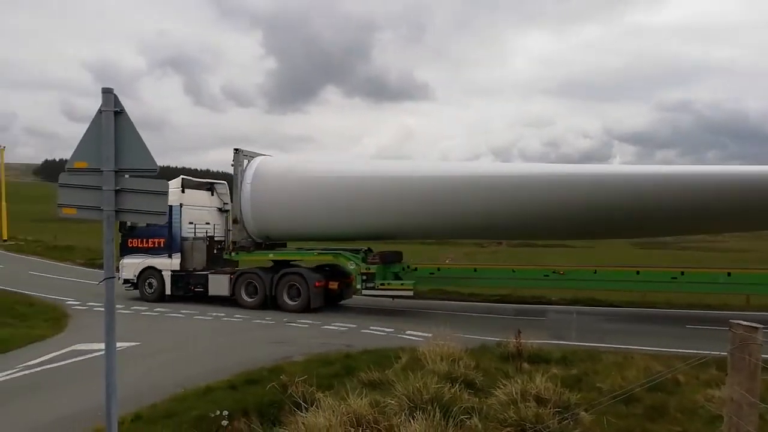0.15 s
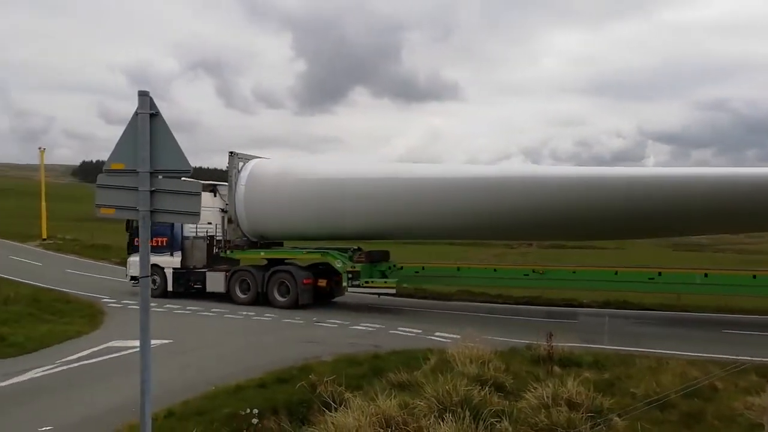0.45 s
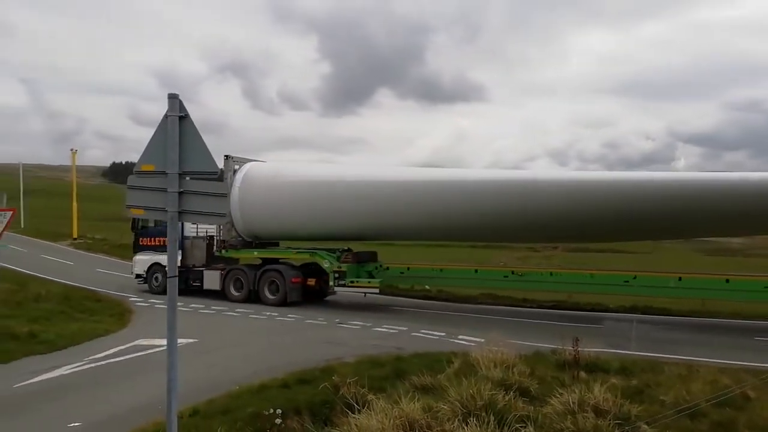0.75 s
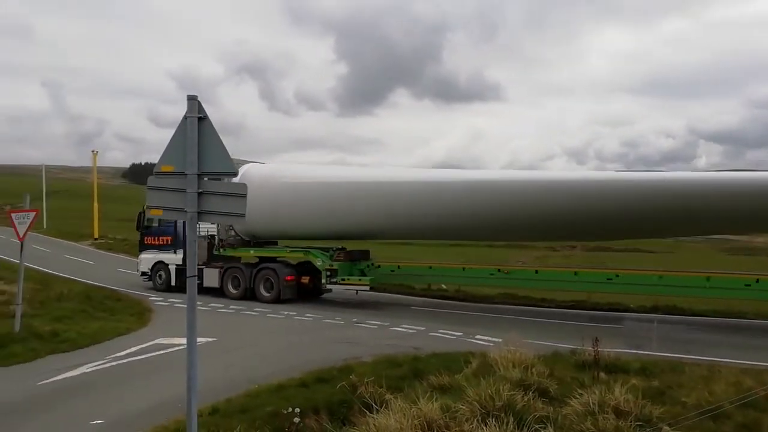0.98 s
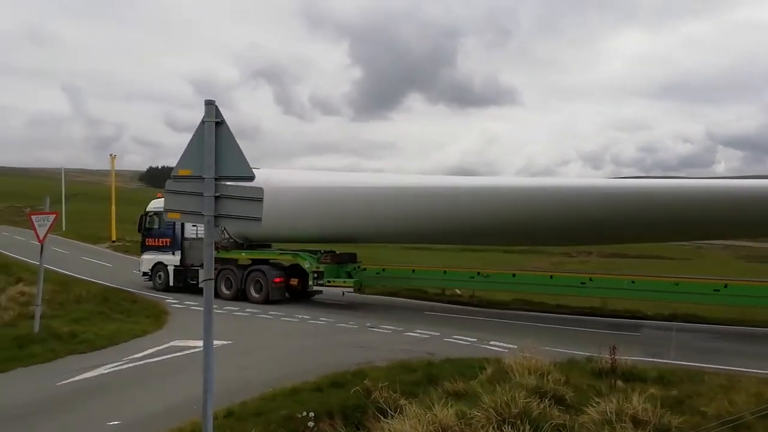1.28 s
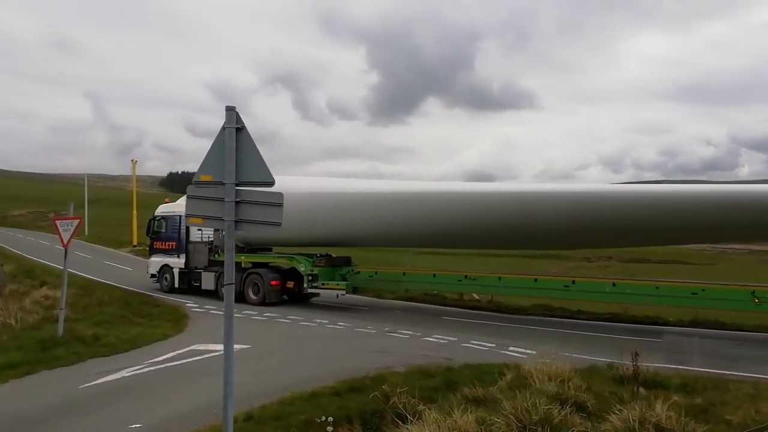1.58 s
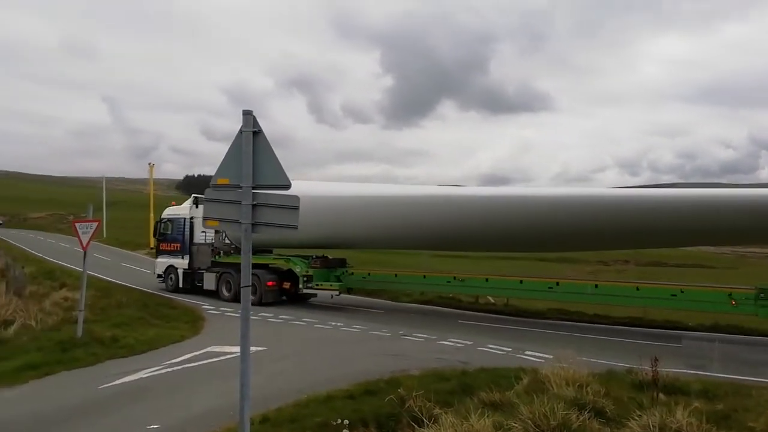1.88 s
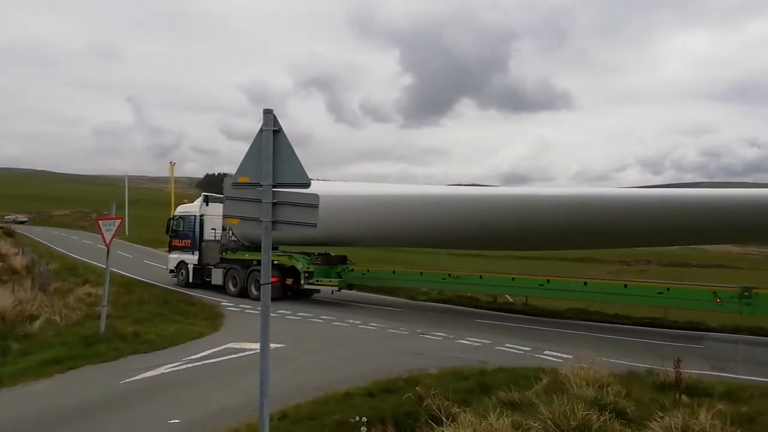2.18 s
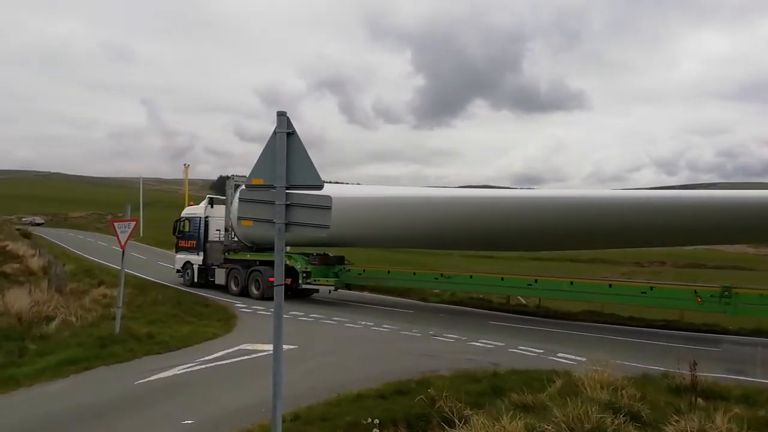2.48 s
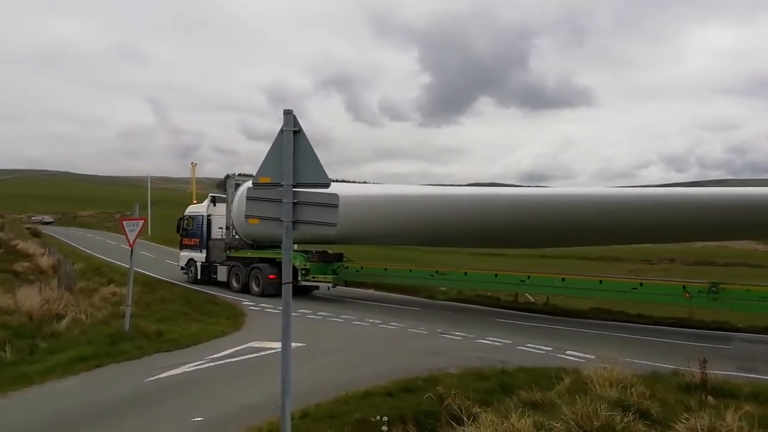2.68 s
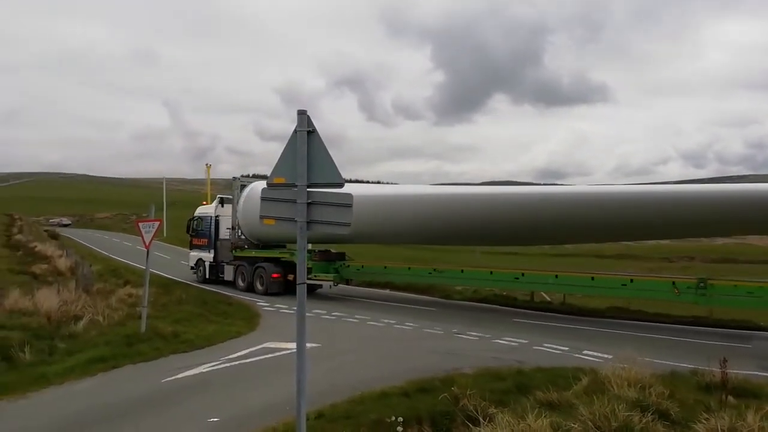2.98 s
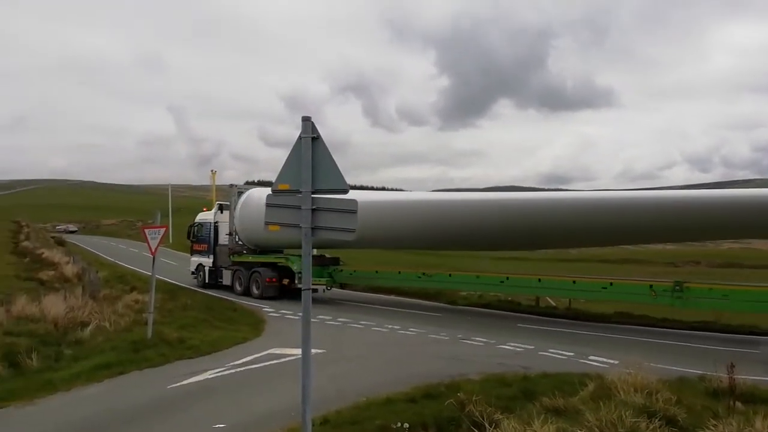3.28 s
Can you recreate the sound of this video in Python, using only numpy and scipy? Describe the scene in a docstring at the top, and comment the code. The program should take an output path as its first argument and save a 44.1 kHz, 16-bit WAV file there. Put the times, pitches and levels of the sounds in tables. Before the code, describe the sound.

A heavy truck draws away on an open moor road: low engine drone, tyre roar and airy hiss fade, with thin high brake squeals, brief squeaks near one second and a final air puff. Spaced stereo microphones outdoors.

```python
"""A heavy diesel truck with a long trailer crawls past and away on an open moor road.
Its exhaust is two trembling sines; tyres, engine block, rumble and leaking air are shaped noise.
Brakes squeal as notes in narrow-band noise; dry joints squeak, tyres scuff and a valve puffs air.
A second engine idles nearby: low sines and a tick of noise per cycle.
A pair of spaced microphone ports hears it from the left."""
import sys
import numpy as np
from scipy import signal
from scipy.fft import rfft, irfft, next_fast_len
from scipy.io import wavfile
from scipy.ndimage import uniform_filter1d, map_coordinates

SR = 44100
rng = np.random.default_rng(int(sys.argv[2]) if len(sys.argv) > 2 else 0)


def pcm_store(signal):
    """Save signal as 16-bit PCM."""
    levels = np.round(np.clip(np.atleast_2d(signal), -1, 1) * 32767)
    wavfile.write(sys.argv[1], SR, levels.astype(np.int16).T)


def convert_level_to_amplitude(level_db):
    """Map a level in decibels to its linear amplitude factor."""
    exponent = np.asarray(level_db, float) / 20
    return 10 ** exponent


N = 152145  # samples

# Exhaust firing note. Each row: time in seconds, pitch in Hz, level in dB.
FIRING_NOTE = [(0, 60, -53), (.1, 63.34, -56), (.3, 62.6, -34.5), (.4, 62.7, -38.5), (.48, 62.7, -37.5),
               (.68, 62.77, -43.5), (.8, 62.4, -32.5), (.88, 60.74, -38.5), (1.1, 59.46, -39),
               (1.21, 59.4, -41), (1.33, 59.3, -39.5), (1.7, 58.5, -72), (3.45, 58.2, -58.5)]
# Harmonics of the firing note. Each row: multiple of the pitch, level relative to the note in dB.
FIRING_HARMONICS = [(1, 0), (2, -22)]

# Idling engine orders. Each row: multiple of IDLE_HZ, level relative to IDLE_DB in dB.
IDLE_HARMONICS = [(1, -6.5), (2, 1.5), (3, -13)]
# Steady low tones by the idling engine. Each row: frequency in Hz, level in dB.
HUM_TONES = [(120, -56.5), (130, -59.5)]
# Colour of the idle ticks. Each row: frequency in Hz, relative density in dB per Hz.
CLATTER_SPECTRUM = [(3800, -21), (4800, 2), (6000, 8), (6900, -24.5)]
IDLE_HZ, IDLE_DB = 28.24, -44
CLATTER_DB, TICK_DECAY_S = -60, 0.02

# Passing truck. Each row: time in seconds, tyre roar in dB, air hiss in dB, both before a fixed lift.
PASS_LEVELS = [(.05, -42, -44.5), (.7, -42, -44), (1.13, -43.5, -46.5), (1.19, -43, -42), (1.25, -43, -46),
               (1.35, -45, -42.5), (1.46, -46, -48), (1.8, -47.5, -52), (2.2, -49.5, -51.5),
               (2.27, -49, -46.5), (2.34, -49.5, -53), (2.75, -50.5, -47), (2.9, -54, -46.5),
               (3.03, -52, -51.5), (3.45, -49, -50.5)]
# Noise colours of the truck. Each row: frequency in Hz, relative density in dB per Hz.
TYRE_SPECTRUM = [(700, -33), (1100, -6.5), (1600, 2), (1820, -3), (2100, 1), (2400, -11.5), (4000, -13),
                 (7000, -28)]
BLOCK_SPECTRUM = [(250, -25), (450, -12.5), (700, -0.5), (1000, 0), (1400, -7.5), (2000, -42.5)]
AIR_SPECTRUM = [(1500, -2.5), (2400, 4), (3900, -4), (5000, -1.5), (6400, -7), (7400, -3), (8700, 4),
                (9400, -3.5), (9800, -6.5), (11500, -11.5), (13000, -28), (16000, -45)]
RUMBLE_SPECTRUM = [(15, -40), (45, -6), (65, -4.5), (95, -8.5), (170, -16.5), (300, -18), (420, -26),
                   (700, -52)]
BLOCK_DB, BLOCK_SWING_SHARE = -49.5, 1.3  # share of the tyre roar's swing in dB
RUMBLE_DB, RUMBLE_SWING_SHARE = -46, 0.49

# Likeness of noise at the two ports. Each row: frequency in Hz, likeness from 0 to 1.
PORT_LIKENESS = [(60, 0.95), (250, 1), (700, 1), (1500, 0.74), (3000, 0.23), (6000, 0.08), (12000, 0.49)]
# Phase between the ports. Each row: frequency in Hz, lead of the left port in radians.
PORT_LEAD = [(0, -0.29), (520, 1.25), (1550, 1.2), (2840, 3.5), (4050, 7.5), (8870, 24.5), (16000, 43)]
# Level between the ports. Each row: frequency in Hz, left over right in dB.
PORT_TILT = [(380, 0), (700, 5), (1290, -6), (2380, 5.5), (4400, -1.5), (8120, 4.5)]

# Brake squeals, a table each. Each row: time in seconds, pitch in Hz, level in dB before a fixed lift.
BRAKE_SQUEALS = [
    [(.53, 10200, -47), (.6, 10360, -36), (.65, 10530, -35.5), (.78, 10520, -33.5), (.91, 10400, -43),
     (1.0, 10280, -42.5), (1.12, 10300, -34.5), (1.155, 10500, -42), (1.23, 10350, -50), (1.3, 10280, -48),
     (1.38, 10300, -62)],
    [(1.42, 10170, -45), (1.56, 10460, -39), (1.64, 10500, -44), (1.7, 10600, -64), (1.74, 10270, -43.5),
     (1.8, 10750, -66), (1.845, 10200, -46), (1.89, 10600, -58)],
    [(2.13, 10000, -76), (2.2, 10340, -43), (2.26, 10500, -54), (2.33, 10380, -51), (2.45, 10500, -67)],
    [(1.485, 9150, -51), (1.535, 8920, -36.5)],
]
# Higher brake squeals, a table each, with the same columns.
BRAKE_WHISTLES = [
    [(0, 14200, -50), (.3, 14500, -53), (.52, 14200, -57)],
    [(.05, 15150, -58), (.15, 15100, -48), (.4, 15200, -57), (.46, 14950, -49), (.6, 15300, -50),
     (.9, 14950, -53), (1.01, 14950, -47), (1.07, 15400, -54), (1.25, 15450, -56), (1.36, 14980, -52),
     (1.55, 15400, -54), (1.68, 14800, -59), (1.82, 14550, -59), (2.03, 14580, -53), (2.11, 14800, -68),
     (2.32, 14800, -62), (2.5, 14850, -58), (2.62, 14150, -52), (2.73, 13950, -51), (2.82, 12900, -56)],
    [(2.07, 16000, -65), (2.14, 15500, -70), (2.23, 16300, -60), (2.31, 15400, -70), (2.4, 15600, -72),
     (2.62, 14800, -64)],
]
SKIRT_DB = -14  # wide fuzz, relative to the narrow band
PORT_DRIFT_KNOTS_PER_S = 16

# Squeaks and groans of dry joints. Each row: start in seconds, end in seconds, start pitch in Hz,
# end pitch in Hz, level in dB, overtone level in dB.
JOINT_SQUEAKS = [(.93, .99, 1895, 1905, -41, -68), (1.005, 1.07, 1945, 1940, -44, -62),
                 (1.05, 1.13, 1932, 1918, -37.5, -61), (1.115, 1.185, 1922, 1900, -39.5, -54),
                 (1.19, 1.232, 1900, 1922, -47, -49), (1.22, 1.305, 1912, 1940, -38.5, -55),
                 (1.3, 1.7, 256, 240, -57, -72), (2.69, 2.87, 1020, 970, -57, -60)]
SQUEAK_EDGE_S = 0.022

# Tyre scuffs. Each row: start in seconds, end in seconds, start pitch in Hz, end pitch in Hz, level in dB.
TYRE_SCUFFS = [(2.21, 2.32, 2050, 2150, -54), (2.72, 2.99, 2100, 1750, -52)]

# Colour of the valve blast. Each row: frequency in Hz, relative density in dB per Hz.
PUFF_SPECTRUM = [(400, -16), (1000, -12), (1300, -0.5), (2300, -10), (4000, -13.5), (5500, -30),
                 (9000, -44)]
PUFF_START_S, PUFF_ATTACK_S, PUFF_HOLD_S, PUFF_RELEASE_S = 3.397, 0.0097, 0.035, 0.012
PUFF_DB = -33.5


def unit(x):
    """Scale to rms 1."""
    return x / np.sqrt(np.mean(np.abs(x) ** 2) + 1e-20)


def along(points, hz):
    """Interpolate (Hz, value) points on a log frequency axis."""
    point_hz, value = np.transpose(points)
    return np.interp(np.log(hz + 1), np.log(point_hz + 1), value)


def curves(rows):
    """One value per sample for each column after the time."""
    time_s, *columns = np.transpose(rows)
    return [np.interp(np.arange(N) / SR, time_s, column) for column in columns]


def wobble(knots_per_s):
    """A smooth random curve through unit-variance knots."""
    knots = rng.standard_normal(int(N * knots_per_s / SR) + 4)
    return map_coordinates(knots, [np.arange(N) * knots_per_s / SR])


def gate(start_s, end_s, attack_s, release_s):
    """0 outside start to end, with straight ramps."""
    t = np.arange(N) / SR
    return np.clip(np.minimum((t - start_s) / attack_s, (end_s - t) / release_s), 0, 1)


def rush(spectrum, patchy_db):
    """Patchy coloured noise of rms 1, with likeness, phase and level set between the ports."""
    cells = signal.stft(rng.standard_normal((2, N)), nperseg=512)[2]
    patches = uniform_filter1d(rng.standard_normal(cells.shape[1:]), size=6, axis=0)
    patches = unit(uniform_filter1d(patches, size=12, axis=1))
    pair = signal.istft(cells * convert_level_to_amplitude(patchy_db * patches), nperseg=512)[1][:, :N]

    size = next_fast_len(N + 8192)
    hz = np.fft.rfftfreq(size, 1 / SR)
    common, opposed = rfft(pair, size)
    angle = np.arccos(np.clip(along(PORT_LIKENESS, hz), 0, 1)) / 2
    common, opposed = common * np.cos(angle), opposed * np.sin(angle)

    lead_hz, lead_rad = np.transpose(PORT_LEAD)
    # half the tilt and lead goes to each port
    skew = convert_level_to_amplitude(along(PORT_TILT, hz) / 2) * np.exp(0.5j * np.interp(hz, lead_hz, lead_rad))
    ports = np.array([(common + opposed) * skew, (common - opposed) / skew])
    return unit(irfft(convert_level_to_amplitude(along(spectrum, hz)) * ports, size)[:, :N])


def tone(hz, level_db, blur_hz, rough_rad, apart_rad):
    """A sine with trembling phase and level; the ports drift apart more slowly."""
    phase = 2 * np.pi * np.cumsum(hz * np.ones(N)) / SR + rough_rad * wobble(blur_hz)
    level_db = level_db + 4 * rough_rad * wobble(blur_hz / 2)
    drift = apart_rad * wobble(blur_hz / 6)
    sway_db = apart_rad * wobble(blur_hz / 9)
    left = convert_level_to_amplitude(level_db + sway_db) * np.cos(phase + drift)
    right = convert_level_to_amplitude(level_db - sway_db) * np.cos(phase - drift)
    return np.sqrt(2) * np.array([left, right])


def exhaust():
    """The firing note sinks as the truck draws away and beats with the idling engine."""
    hz, level_db = curves(FIRING_NOTE)
    return sum(tone(k * hz, level_db + db, blur_hz=12 * k, rough_rad=0.19 * k, apart_rad=0.022 * k)
               for k, db in FIRING_HARMONICS)


def idler():
    """A steady engine: low orders, hums and one decaying tick of clatter per cycle."""
    throb = sum(tone(k * IDLE_HZ, IDLE_DB + db, blur_hz=6, rough_rad=0.2, apart_rad=0.012 * k)
                for k, db in IDLE_HARMONICS)
    hums = sum(tone(hz, db, blur_hz=5.92, rough_rad=0.32, apart_rad=0.12) for hz, db in HUM_TONES)
    since_tick_s = (np.arange(N) / SR) % (1 / IDLE_HZ)
    ticks = unit(np.exp(-since_tick_s / TICK_DECAY_S) * rush(CLATTER_SPECTRUM, patchy_db=3.5))
    return throb + hums + convert_level_to_amplitude(CLATTER_DB) * ticks


def roar():
    """Tyres, engine block, leaking air and low rumble: noises that swell and fade with the pass."""
    roar_db, air_db = curves(PASS_LEVELS)
    swing_db = roar_db - roar_db.mean()
    shared_db = 0.25 * wobble(8.45)
    tyre_db = roar_db + 0.9 + shared_db + 0.77 * wobble(25.7)
    block_db = BLOCK_DB + BLOCK_SWING_SHARE * swing_db + shared_db
    air_db = air_db + 2.5 + shared_db + 0.4 * wobble(28)
    rumble_db = RUMBLE_DB + RUMBLE_SWING_SHARE * swing_db + 1.46 * wobble(9.15)
    tyres = convert_level_to_amplitude(tyre_db) * rush(TYRE_SPECTRUM, patchy_db=1.03)
    block = convert_level_to_amplitude(block_db) * rush(BLOCK_SPECTRUM, patchy_db=0.9)
    air = convert_level_to_amplitude(air_db) * rush(AIR_SPECTRUM, patchy_db=2.0)
    rumble = convert_level_to_amplitude(rumble_db) * rush(RUMBLE_SPECTRUM, patchy_db=1.37)
    return tyres + block + air + rumble


def shimmer(knots_per_s):
    """Complex narrow-band noise of rms 1 with a weaker skirt four times as wide."""
    core = wobble(knots_per_s) + 1j * wobble(knots_per_s)
    skirt = wobble(4 * knots_per_s) + 1j * wobble(4 * knots_per_s)
    return unit(core + convert_level_to_amplitude(SKIRT_DB) * skirt)


def squeals(tables, lift_db, width_hz, steady, alike):
    """Pads sing on the drums: a note in a narrow noise band, partly separate at each port."""
    out = 0
    for rows in tables:
        hz, level_db = curves(rows)
        common = shimmer(width_hz)
        own = np.array([shimmer(width_hz), shimmer(width_hz)])
        # the note's phase slides between the ports
        slide_rad = np.array([[1.5], [-1.5]]) * wobble(PORT_DRIFT_KNOTS_PER_S)
        note = steady * np.exp(1j * slide_rad)
        envelope = convert_level_to_amplitude(1.7 * wobble(22)) * unit(note + alike * common + own)
        carrier = np.exp(2j * np.pi * np.cumsum(hz) / SR)
        line = np.sqrt(2) * np.real(envelope * carrier)
        out = out + gate(rows[0][0], rows[-1][0], 0.015, 0.02) * convert_level_to_amplitude(level_db + lift_db) * line
    return out


def squeak():
    """Dry joints slip in short, nearly clean gliding notes with one overtone."""
    out = 0
    for start_s, end_s, from_hz, to_hz, level_db, overtone_db in JOINT_SQUEAKS:
        hz, = curves([(start_s, from_hz), (end_s, to_hz)])
        note = tone(hz, level_db, blur_hz=40, rough_rad=0.3, apart_rad=0.3)
        overtone = tone(2 * hz, overtone_db, blur_hz=40, rough_rad=0.45, apart_rad=0.6)
        out = out + gate(start_s, end_s, SQUEAK_EDGE_S, SQUEAK_EDGE_S) * (note + overtone)
    return out


def scuffs():
    """Tyres drag sideways: gliding sines roughened into bands by fast phase tremble."""
    out = 0
    for start_s, end_s, from_hz, to_hz, level_db in TYRE_SCUFFS:
        hz, = curves([(start_s, from_hz), (end_s, to_hz)])
        band = tone(hz, level_db, blur_hz=900, rough_rad=1.3, apart_rad=0.65)
        out = out + gate(start_s, end_s, 0.033, 0.049) * band
    return out


def puff():
    """A valve lets off a short blast of air: gated coloured noise."""
    end_s = PUFF_START_S + PUFF_ATTACK_S + PUFF_HOLD_S + PUFF_RELEASE_S
    level = convert_level_to_amplitude(PUFF_DB + 0.43 * wobble(110))
    blast = gate(PUFF_START_S, end_s, PUFF_ATTACK_S, PUFF_RELEASE_S)
    return level * blast * rush(PUFF_SPECTRUM, patchy_db=2.5)


def scene():
    """All sources at the two ports."""
    low_pads = squeals(BRAKE_SQUEALS, lift_db=1.03, width_hz=150, steady=1.02, alike=0.76)
    high_pads = squeals(BRAKE_WHISTLES, lift_db=2, width_hz=400, steady=1.1, alike=1.1)
    return exhaust() + idler() + roar() + low_pads + high_pads + squeak() + scuffs() + puff()


def low_pass(x):
    """Removes everything above the highest recorded frequency."""
    return signal.sosfilt(signal.butter(12, 15890, fs=SR, output="sos"), x)


def record(dry):
    """The finished mix as stored."""
    return low_pass(dry)


dry = scene()
out = record(dry)
pcm_store(out)
```